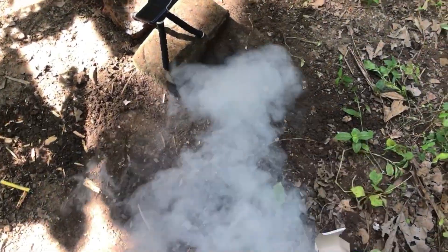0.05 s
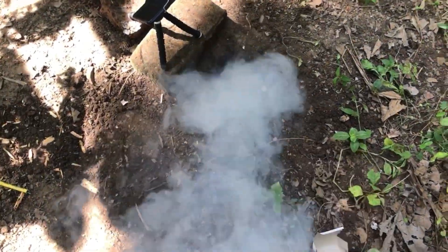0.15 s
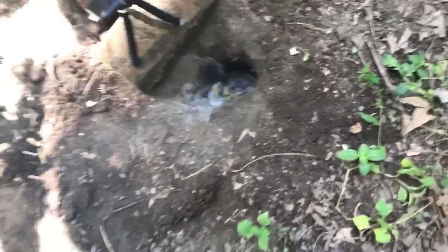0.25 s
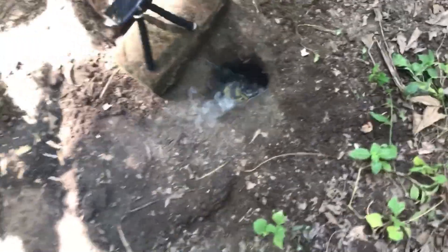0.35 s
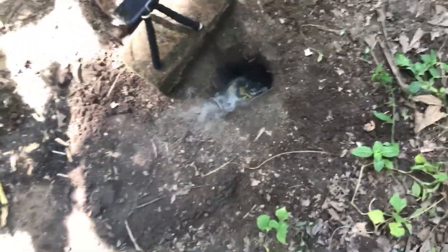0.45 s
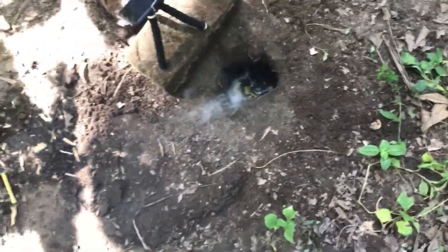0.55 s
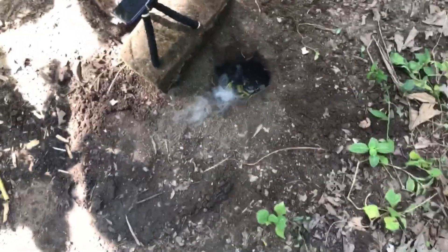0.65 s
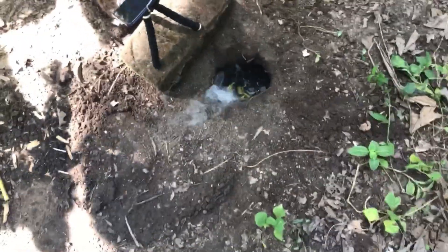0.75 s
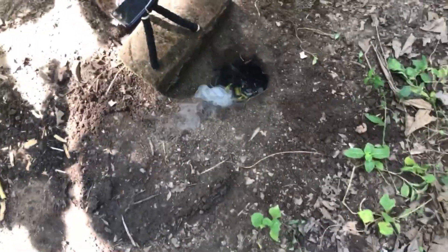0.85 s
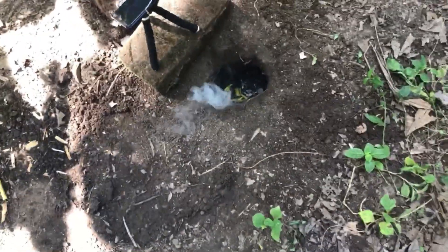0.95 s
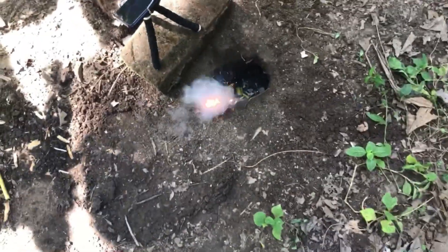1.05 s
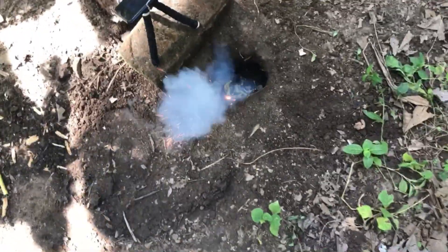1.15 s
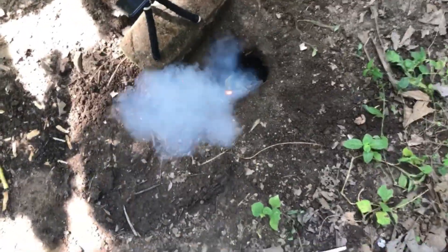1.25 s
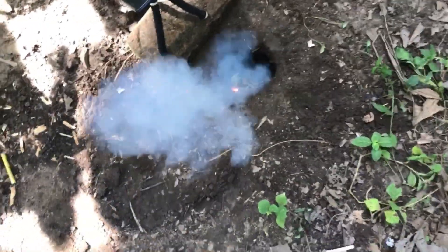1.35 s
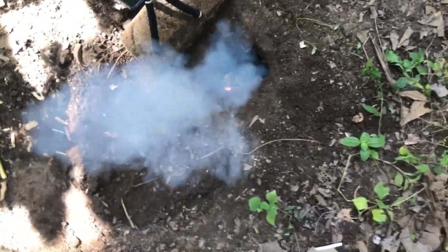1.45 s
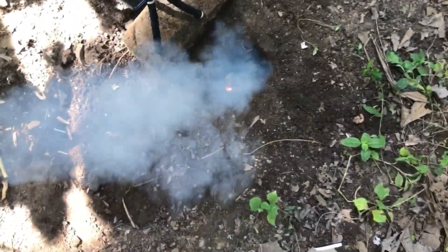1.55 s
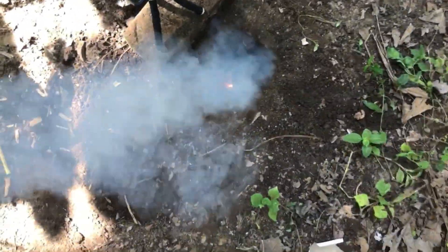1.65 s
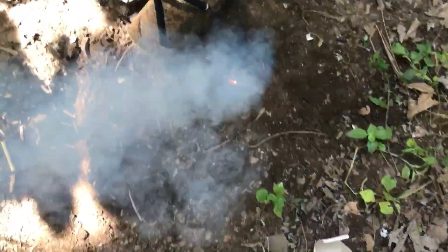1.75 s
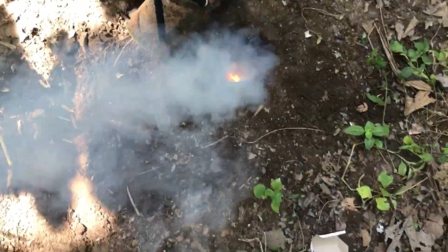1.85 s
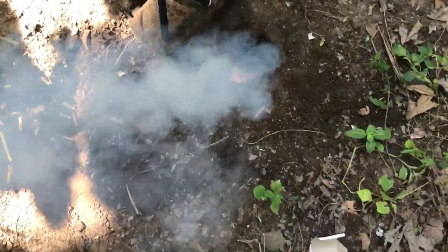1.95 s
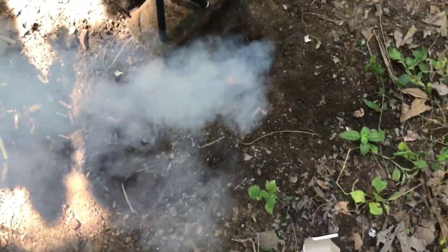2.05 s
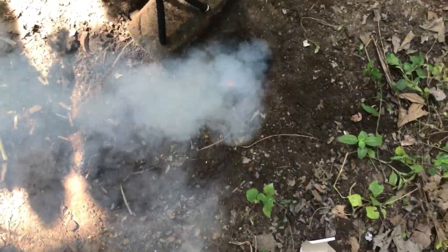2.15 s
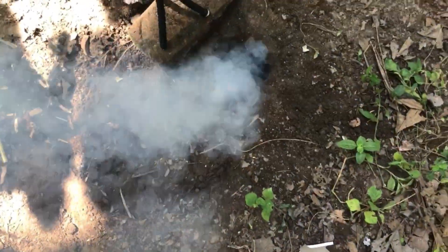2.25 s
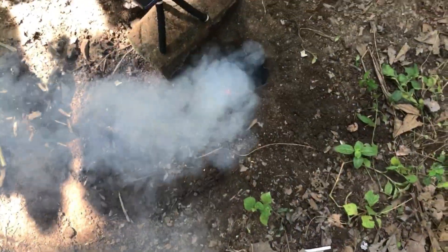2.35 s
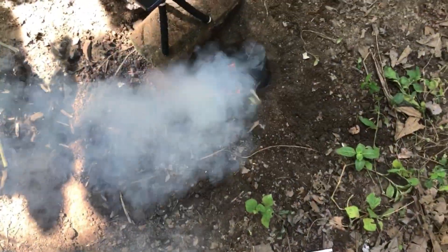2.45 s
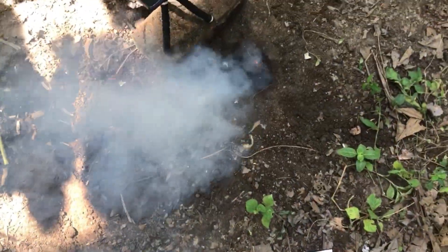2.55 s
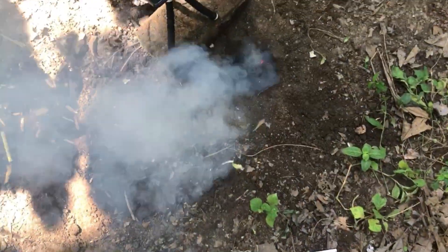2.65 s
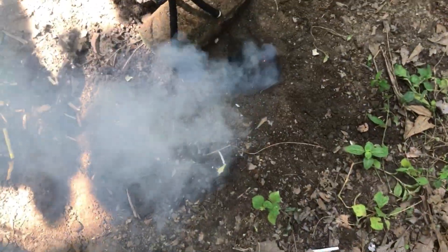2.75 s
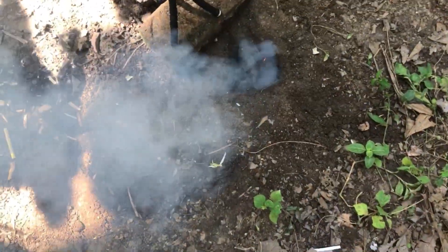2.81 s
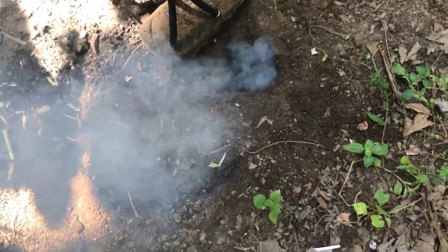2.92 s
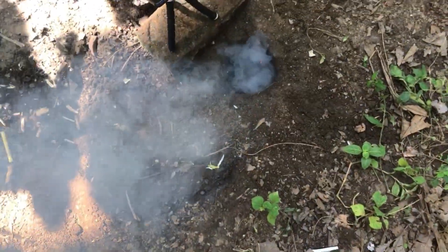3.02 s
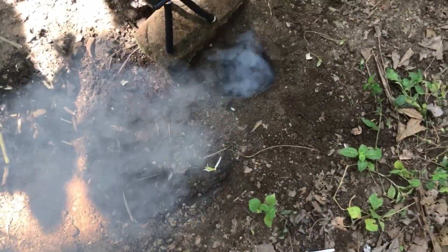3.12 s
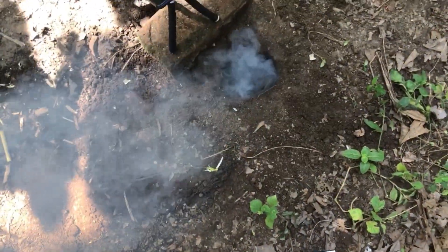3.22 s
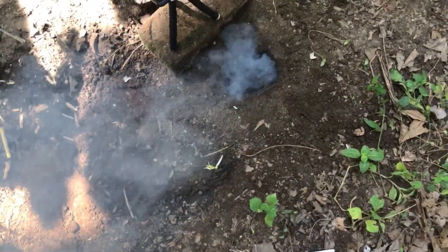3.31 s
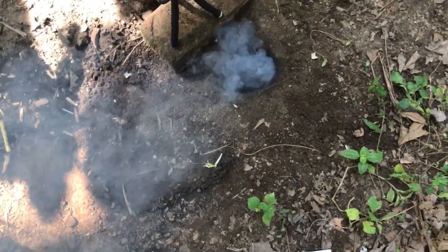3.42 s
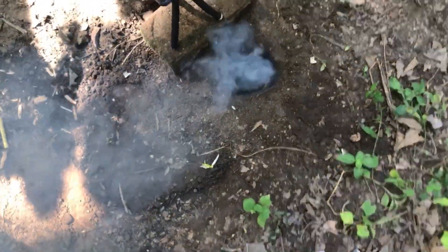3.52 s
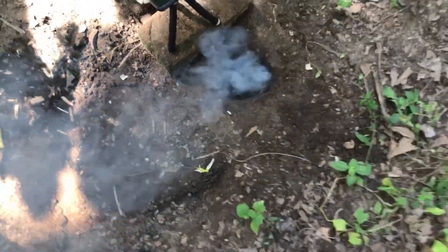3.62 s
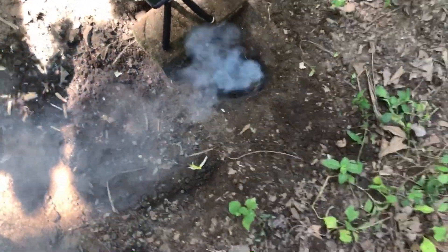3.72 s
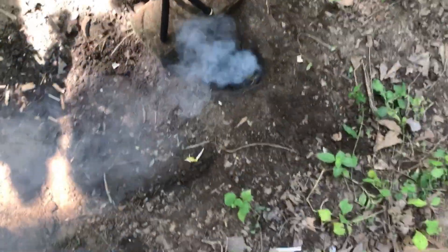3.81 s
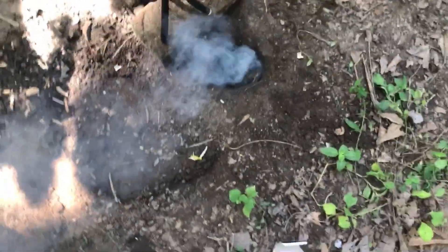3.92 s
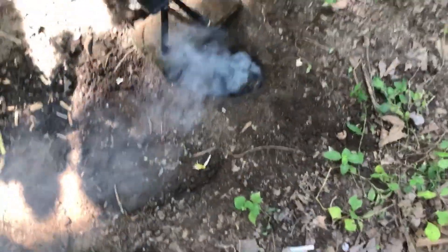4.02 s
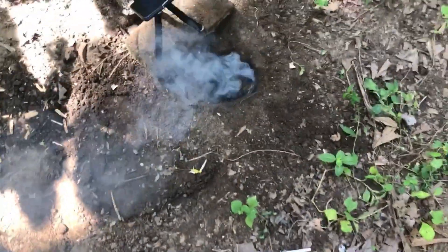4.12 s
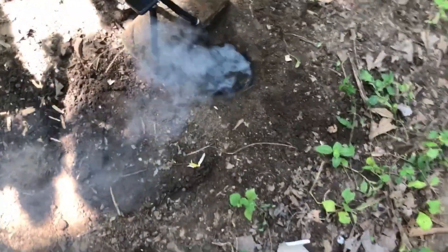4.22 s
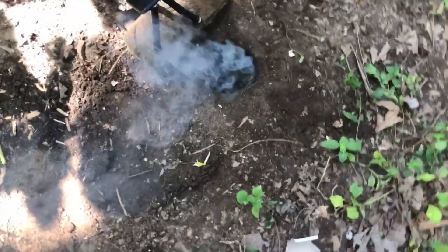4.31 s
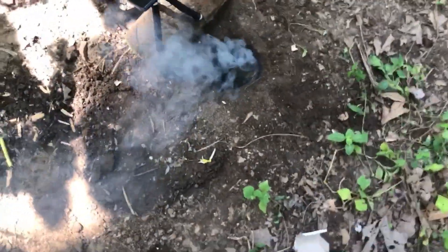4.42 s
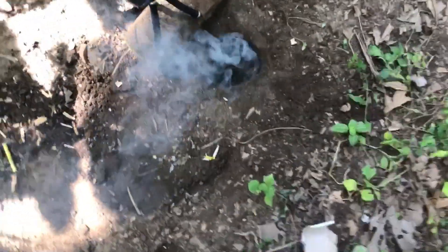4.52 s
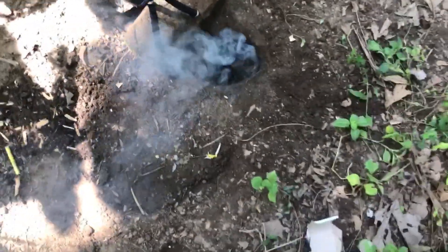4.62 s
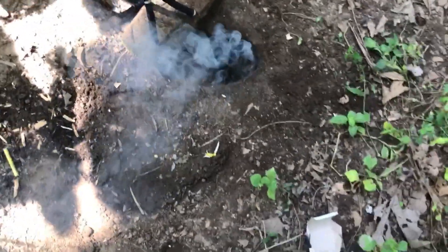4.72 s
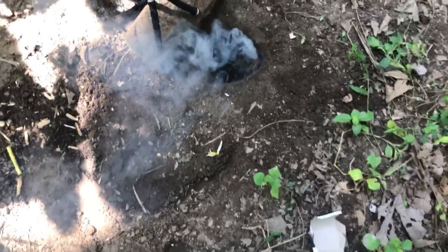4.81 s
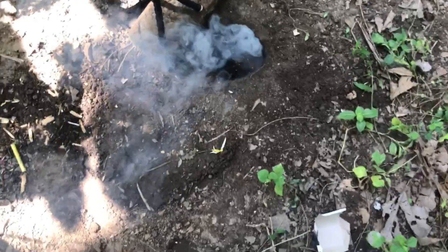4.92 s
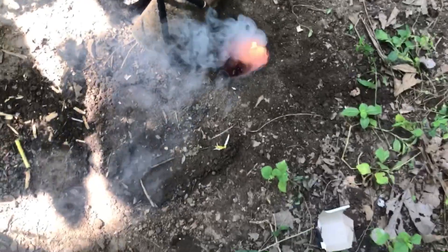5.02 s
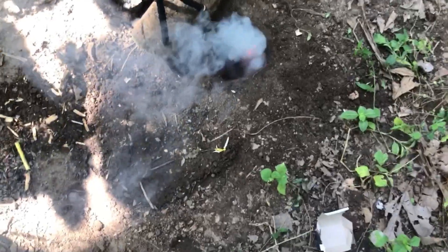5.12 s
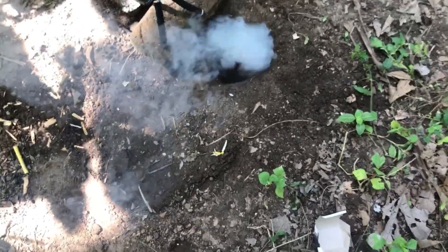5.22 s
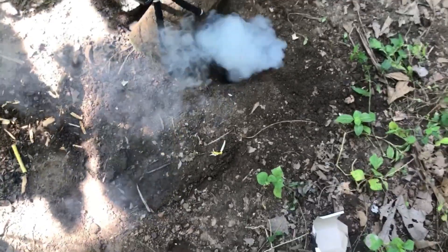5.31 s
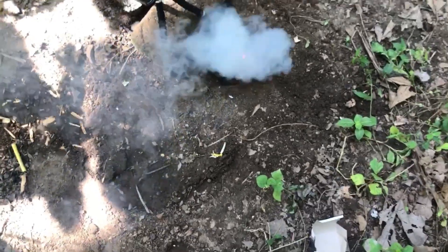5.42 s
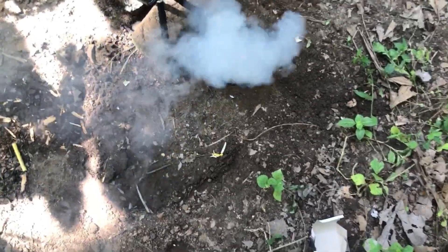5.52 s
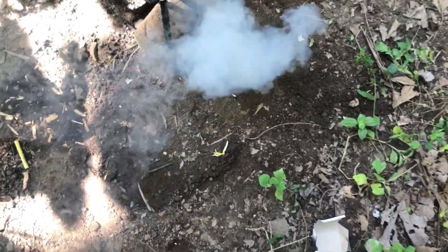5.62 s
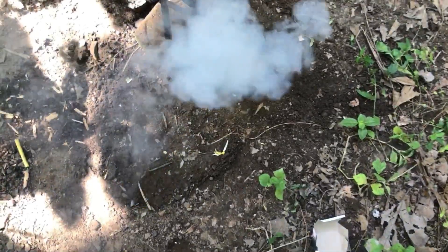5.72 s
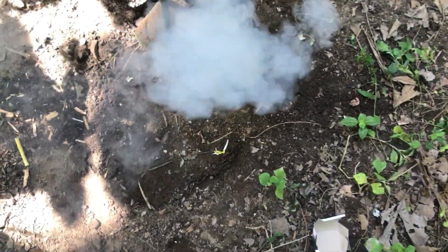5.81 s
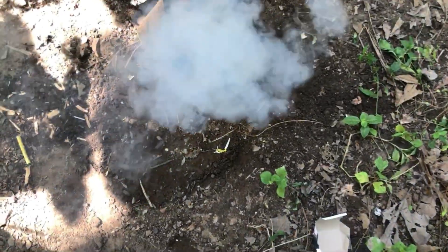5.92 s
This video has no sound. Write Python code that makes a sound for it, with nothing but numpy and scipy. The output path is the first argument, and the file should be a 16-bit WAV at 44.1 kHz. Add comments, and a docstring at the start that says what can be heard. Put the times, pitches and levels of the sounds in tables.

```python
"""Whistling firecrackers in a hole

Small firecrackers go off in a hole in the ground, among trees, while air rumbles at the microphone. Fuses hiss
and spit: these are coloured noise, short bursts and random pops. Each tube shrieks as a stack of locked tones
over a noisy gas jet; its pitch sinks as the fuel burns down and the air column grows. The first tube whistles
alone; then another fuse burns down into a bang of decaying noise that the ground and trees answer. Two more
then whistle together and beat against each other."""
import sys
import numpy as np
from scipy import signal
from scipy.fft import rfft, irfft, next_fast_len
from scipy.io import wavfile
from scipy.ndimage import uniform_filter1d, minimum_filter1d, map_coordinates

SR = 44100
rng = np.random.default_rng(int(sys.argv[2]) if len(sys.argv) > 2 else 0)


def unload_wav(signal):
    """Save mono or channel-first audio to the path in sys.argv[1] as 16-bit WAV at rate SR, clipped to [-1, 1]."""
    wavfile.write(
        sys.argv[1],
        SR,
        np.round(np.clip(np.atleast_2d(signal).T, -1, 1) * 32767).astype(np.int16),
    )


N = 262836
TIME = np.arange(N) / SR  # seconds


def amp(db):
    """Turn decibels into gain."""
    return 10 ** (np.asarray(db) / 20)


def unit(x):
    """Scale a sound to an rms of 1."""
    return x / np.sqrt(np.mean(x ** 2) + 1e-20)


def along(points, hz):
    """Read a value at hz from (Hz, value) points, on a logarithmic frequency axis."""
    point_hz, value = np.transpose(points)
    return np.interp(np.log(hz + 1), np.log(point_hz + 1), value)


def curves(rows):
    """Turn each column after the time into one value per sample."""
    seconds, *columns = np.transpose(rows)
    return [np.interp(TIME, seconds, column) for column in columns]


def wobble(rate):
    """Make a smooth random curve with rate knots a second."""
    knots = rng.standard_normal(int(N * rate / SR) + 4)
    return map_coordinates(knots, [TIME * rate])


def gate(start, end, attack, release):
    """Rise softly from start, hold, and die away exponentially after end."""
    rise = 1 - np.exp(-(np.maximum(TIME - start, 0) / attack) ** 2)
    return rise * np.exp(-np.maximum(TIME - end, 0) / release)


def bump(s, half):
    """Make a bell-shaped swell of height 1 around s."""
    return np.exp(-((TIME - s) / half) ** 2)


def filtered(x, response):
    """Multiply the spectrum of x by a response that depends on frequency."""
    size = next_fast_len(N + SR // 2)
    spectrum = rfft(x, size) * response(np.fft.rfftfreq(size, 1 / SR))
    return irfft(spectrum, size)[:N]


def coloured(x, spectrum):
    """Colour a sound with a table of Hz and dB."""
    return filtered(x, lambda hz: amp(along(spectrum, hz)))


def noise(spectrum):
    """Make noise of rms 1 with the given colour."""
    return unit(coloured(rng.standard_normal(N), spectrum))


def moving_band(hz, width_hz):
    """Make narrow noise with a moving centre and width."""
    phase = 2 * np.pi * np.cumsum(hz) / SR
    clock = np.cumsum(np.abs(width_hz)) / SR  # a wider band drifts faster

    def drift():
        return map_coordinates(rng.standard_normal(N // 10), [clock], mode="wrap")

    return drift() * np.sin(phase) + drift() * np.cos(phase)


def burst(s, hz, width, t60):
    """Pass a short puff of noise through one resonance."""
    def resonance(f):
        return 1j * f * width / (hz * hz - f * f + 1j * f * width)

    ringing = unit(filtered(rng.standard_normal(N), resonance))
    age = TIME - s
    return ringing * (age > 0) * amp(-60 * np.abs(age) / t60)


# Air moving at the microphone. Each row: time in seconds, rumble level in dB.
AIR_LEVELS = [(0, -45), (0.2, -37.5), (0.95, -37.5), (1.2, -58.5), (1.6, -69), (1.85, -64.5), (2.3, -49),
              (3.0, -55), (3.4, -45), (4.7, -43), (5.1, -57), (5.96, -64.5)]
# Colour of the rumble. Each row: frequency in Hz, level in dB.
RUMBLE_COLOUR = [(12, -43), (20, -17), (40, -5.5), (64, 1), (108, -11), (163, -20.5), (242, -23.5),
                 (300, -40), (390, -55.5), (660, -120)]
# Colour of the outdoor hush. Each row: frequency in Hz, level in dB.
HUSH_COLOUR = [(60, -25), (130, -12.5), (350, -2.5), (700, -10), (1300, -11), (3000, -10), (6000, -20.5),
               (14000, -36.5)]
# Low hum and faint far tone. Each row: start in seconds, start of the fade in seconds, pitch in Hz,
# level in dB, attack in seconds, time to fade by 60 dB in seconds.
STEADY_TONES = [(3.94, 4.86, 60.6, -31, 0.022, 0.3), (4.7, 4.9, 60.6, -44.5, .1, 2.6),
                (4.2, 4.17, 640, -51, 0.024, 0.45)]
HUSH_DB, HUSH_FOLLOWS = -37, 0.45  # hush level before it follows the rumble, and share of the rumble dB added


def outdoors():
    """Air rumbles at the microphone over a hush; a low hum and a faint far tone come and go."""
    rumble_db, = curves(AIR_LEVELS)
    rumble = amp(rumble_db + 1.7 * wobble(3.3)) * noise(RUMBLE_COLOUR)
    hush = amp(HUSH_DB + HUSH_FOLLOWS * rumble_db) * noise(HUSH_COLOUR)
    tones = np.zeros(N)
    for start, end, hz, db, attack, t60 in STEADY_TONES:
        swell = gate(start, end, attack, t60 / np.log(1000))
        tones += amp(db) * swell * np.sin(2 * np.pi * hz * TIME)
    return rumble + hush + np.sqrt(2) * tones


# How long the trees ring. Each row: frequency in Hz, time to fade by 60 dB in seconds.
TREE_FADES = [(200, 0.42), (2000, 0.63), (3800, 0.87), (8000, 0.34), (14000, 0.83)]


def trees(x):
    """Trunks and leaves scatter the sound into a tail that fades at its own pace at each frequency."""
    hz, t, cells = signal.stft(rng.standard_normal(SR), SR, nperseg=256)
    fade = amp(-60 * t / along(TREE_FADES, hz)[:, None])
    tail = signal.istft(cells * fade, SR, nperseg=256)[1]
    return signal.fftconvolve(x, tail / np.linalg.norm(tail))[:N]


def hollow(x, t60):
    """The hole and the ground around it send back quick reflections."""
    t = TIME[:SR // 5]
    tail = rng.standard_normal(len(t)) * amp(-60 * t / t60)
    return signal.fftconvolve(x, tail / np.linalg.norm(tail))[:N]


# Snapping sparks. Each row: time in seconds, level in dB, resonance in Hz.
SPARK_SNAPS = [(1.3375, -19, 4200), (2.3965, -29, 2800), (3.312, -50, 6500), (3.359, -42, 3194),
               (3.578, -41, 5000), (3.685, -46.5, 6180), (3.77, -50, 3000), (3.938, -42, 3500)]
# Gas puffs in the hole. Each row: time in seconds, level in dB, time to fade by 60 dB in seconds.
GAS_PUFFS = [(5.014, -36.5, 0.27), (5.052, -24.5, .09), (5.444, -37.5, 0.18)]


def sparks():
    """Sparks snap; puffs of gas sound the hollow of the hole."""
    snaps = sum(amp(db) * burst(s, hz, width=4500, t60=.02) for s, db, hz in SPARK_SNAPS)
    puffs = sum(amp(db) * burst(s, hz=365, width=150, t60=t60) for s, db, t60 in GAS_PUFFS)
    soft_snaps = filtered(snaps, lambda hz: 1 / (1 + (hz / 8000) ** 4))
    soft_puffs = filtered(puffs, lambda hz: 1 / (1 + (hz / 750) ** 4))
    return soft_snaps + soft_puffs


# Colour of popping powder grains. Each row: frequency in Hz, level in dB.
CRACKLE_COLOUR = [(500, -24), (2500, -7), (6500, -2), (10000, 1), (15000, -26.5)]


def crackle(burn, count=40):
    """Grains of powder pop at random, each as loud as the burning at that moment allows."""
    when, weakness = rng.random((count, 2)).T
    pops = np.zeros(N)
    pops[(when * (N - 1)).astype(int)] = amp(33.5 - 13 * weakness)
    return coloured(hollow(pops * burn, t60=.015), CRACKLE_COLOUR)


# Burning fuses, with end levels before the last flare. Each row: start in seconds, end in seconds,
# fade-in in seconds, hiss level at the end in dB, its swell in dB per second, sizzle level at the end in dB,
# its swell in dB per second (negative sinks), mouth resonance at the end in Hz.
FUSE_BURNS = [(0.204, 1.005, 0.007, -41, 14, -51, 8.5, 4490), (1.85, 2.454, .1, -51, 52, -51, 44, 4400),
              (2.65, 4.83, .8, -39.5, 12, -51.5, -1.5, 4155)]
CATCH_DB, CATCH_S, FUSE_OUT_S = 12.5, 0.038, .012  # a fuse flares as it reaches the charge, then goes out
MOUTH_RISE_HZ_PER_S = 320
EDGE_DB = -14  # shrill edge relative to the sizzle, outside the spurt
SPURT_S, SPURT_HALF_S, SPURT_DB = 3.72, 0.6, 18.5  # the last fuse blows a narrow jet for a while


def fuse_controls():
    """Hiss, sizzle, edge and mouth resonance change as a fuse burns into its tube and flares at the charge."""
    hiss, sizzle, mouth_hz = np.zeros((3, N))
    for start, end, fade_in, hiss_db, hiss_swell, sizzle_db, sizzle_swell, hz in FUSE_BURNS:
        left = np.clip(end - TIME, 0, end - start)  # seconds left to burn
        flare = amp(CATCH_DB * np.exp(-left / CATCH_S))
        alight = gate(start, end, fade_in, FUSE_OUT_S) * flare
        hiss += alight * amp(hiss_db - hiss_swell * left)
        sizzle += alight * amp(sizzle_db - sizzle_swell * left)
        mouth_hz = np.where(TIME > start, hz - MOUTH_RISE_HZ_PER_S * left, mouth_hz)
    edge = sizzle * amp(EDGE_DB + SPURT_DB * bump(SPURT_S, SPURT_HALF_S))
    return hiss, sizzle, edge, mouth_hz


# Colour of the breath across the tube mouth. Each row: frequency in Hz, level in dB.
MOUTH_COLOUR = [(400, -8), (1200, -20), (2500, -3.5), (3500, 0.5), (4700, 1), (5400, -7.5), (7500, -18.5),
                (10000, -37.5)]
# Colour of the sizzling powder. Each row: frequency in Hz, level in dB.
SIZZLE_COLOUR = [(4000, -28.5), (6500, -21.5), (7500, -17), (9500, -4), (10700, -5), (12300, -1),
                 (13300, -10.5), (15500, -25.5)]
# Colour of a fuse's narrow jet. Each row: frequency in Hz, level in dB.
EDGE_COLOUR = [(7500, -30.5), (8700, -13), (9650, 1.5), (10500, -13.5), (11500, -29)]


def fuses():
    """Burning powder sizzles, pops and blows across the tube mouth."""
    hiss, sizzle, edge, mouth_hz = fuse_controls()
    ring = amp(-1.5) * moving_band(mouth_hz, np.full(N, 750))  # 750 Hz wide
    breath = amp(-4.5) * noise(MOUTH_COLOUR)
    mouth = hiss * amp(1.1 * wobble(120)) * (ring + breath)
    powder = sizzle * noise(SIZZLE_COLOUR) + edge * noise(EDGE_COLOUR)
    return mouth + amp(1.2 * wobble(210)) * powder + crackle(edge)


ATTACK_S, RELEASE_S = .008, 0.0055  # moans and notes start and stop quickly
# Modes of the moaning tube. Each row: multiple of the moan's pitch, level in dB relative to the moan.
MOAN_MULTIPLES = [(1, -4), (1.5, -15.5), (2, 2.5), (4, -9)]
MOAN_START_S, MOAN_END_S, MOAN_DB = .205, 1.005, -49.5
MOAN_HZ, MOAN_SAG_HZ_PER_S = 820, 148  # starting pitch and how fast it sinks
MOAN_WIDTH_HZ, MOAN_NARROWS_S = 260, 0.46  # starting width and time constant of its narrowing


def moan():
    """Before the tube locks into its note, turbulence sounds its modes as noise bands that sink and narrow."""
    age = np.clip(TIME - MOAN_START_S, 0, MOAN_END_S - MOAN_START_S)
    hz = (MOAN_HZ - MOAN_SAG_HZ_PER_S * age) * (1 + 0.012 * wobble(30))
    width_hz = MOAN_WIDTH_HZ * np.exp(-age / MOAN_NARROWS_S)
    modes = sum(amp(db + 1.4 * wobble(14)) * moving_band(k * hz, width_hz) for k, db in MOAN_MULTIPLES)
    return gate(MOAN_START_S, MOAN_END_S, ATTACK_S, RELEASE_S) * amp(MOAN_DB) * modes


# Colour of the returning bang. Each row: frequency in Hz, level in dB.
ECHO_COLOUR = [(50, -16.5), (130, -9), (380, -1), (620, -10), (1000, -2), (2500, 0.5), (3800, -2.5),
               (6000, -12), (12000, -21), (14500, -33)]
# Colour of the air in the hole and the ground. Each row: frequency in Hz, level in dB.
BOOM_COLOUR = [(30, -8), (70, -2.5), (140, 0.5), (250, -7.5), (400, -4.5), (700, -36)]
NEAR_DB, NEAR_T60_S = -16, .33  # from the ground nearby
FAR_DB, FAR_RISE_S, FAR_HOLD_S, FAR_T60_S = -34, .11, 0.27, .85  # from the trees
THUD_DB, THUD_LUMPS_DB = -17, 3  # the bass returns in lumps: its level and unevenness


def echo(age):
    """The ground answers the bang at once; the trees hold it for a moment and let it die."""
    near = amp(NEAR_DB - 60 * age / NEAR_T60_S)
    far_fade = amp(FAR_DB - 60 * np.maximum(age - FAR_HOLD_S, 0) / FAR_T60_S)
    far = far_fade * (1 - np.exp(-age / FAR_RISE_S))
    thuds = amp(THUD_DB + THUD_LUMPS_DB * wobble(30)) * noise(BOOM_COLOUR)
    return np.hypot(near, far) * (amp(0.82 * wobble(70)) * noise(ECHO_COLOUR) + thuds)


# Colour of the blast. Each row: frequency in Hz, level in dB.
BLAST_COLOUR = [(59, -35), (100, -1.5), (184, -5), (614, -6.5), (712, -9.5), (843, -1), (1110, -7),
                (1460, -4.5), (2420, -2), (6390, -14), (11800, -17.5), (15500, -32.5)]
BANG_S = 2.4632


def bang():
    """The shock rattles and booms in the hole, a pressure wave swings the microphone, and the trees answer."""
    age = np.maximum(TIME - BANG_S, 0)
    lit = TIME > BANG_S
    # each part loses 60 dB in the time that divides its age
    shock = noise(BLAST_COLOUR) * amp(-5 - 60 * age / .014)
    rattle = noise(BLAST_COLOUR) * amp(-5.5 - 60 * age / 0.26 + 2.3 * wobble(260))
    boom = noise(BOOM_COLOUR) * amp(-12 - 60 * age / 0.16)
    # the swing follows 8 ms later, starting at 45 Hz and slowing down
    swing_age = np.maximum(age - .008, 0)
    swell = (1 - np.exp(-swing_age / 0.0048)) * amp(3.0 - 60 * swing_age / .11)
    swing = -swell * np.cos(2 * np.pi * 45 * swing_age / (1 + swing_age / 0.44))
    # so strong a blast drives the diaphragm to the end of its travel
    blast = np.tanh(shock + rattle + boom + swing)
    return lit * (blast + echo(age))


# Colour of the jet's roar. Each row: frequency in Hz, level in dB.
ROAR_COLOUR = [(100, -5.5), (250, -1), (420, 10.5), (620, -4), (900, 1.5), (1300, -7.5), (2000, 0.5),
               (3000, -23), (6000, -47)]
# Colour of the jet's rush. Each row: frequency in Hz, level in dB.
RUSH_COLOUR = [(1200, -29), (2200, -7), (3200, -2), (3900, 7), (4600, 2), (5200, -13.5), (5700, -21),
               (7300, -14.5), (9200, -8), (10300, -9), (12300, 4), (13300, -15), (15000, -33)]
ROAR_GROWS, RUSH_DB = 1.2, -7  # roar and rasp swell 1.2 times as many dB as the rush; rush relative to thrust
RASP_HZ, RASP_WIDTH_HZ = 1045, 800  # the middle register of a gas jet


def exhaust(thrust_db, swell_db, roar_db, rasp_db):
    """The gas jet of a whistling tube sputters under its note; its roar and rasp grow fastest in a flare."""
    sputter = amp(thrust_db + 2.5 * wobble(220) + 0.9 * wobble(35))
    roar = amp(roar_db) * noise(ROAR_COLOUR)
    rasp = amp(rasp_db) * moving_band(np.full(N, RASP_HZ), np.full(N, RASP_WIDTH_HZ))
    rush = amp(RUSH_DB + swell_db) * noise(RUSH_COLOUR)
    return sputter * (amp(ROAR_GROWS * swell_db) * (roar + rasp) + rush)


# Uneven burning makes a tube choke, splutter or jump in pitch. Each row: time in seconds,
# half length in seconds, pitch jump in Hz, change of the note in dB, change of the gas noise in dB.
BURN_SURGES = [(1.006, .003, -80, -16, 6), (1.066, .006, 150, -5, 1), (1.105, .04, 0, 0, 3),
               (1.832, .013, 260, -3, 5), (4.827, .006, 150, 0, 3), (4.877, .014, 130, -4, 6),
               (5.36, .05, 0, 0, 2), (5.458, .022, 70, 2, 4), (5.79, .008, -30, -2, 6),
               (5.804, .007, 280, 0, 2)]


def surges():
    """Uneven burning adds up to a pitch jump (Hz), a note change (dB) and a gas noise change (dB)."""
    return sum(np.outer(change, bump(s, half)) for s, half, *change in BURN_SURGES)


# Upper partials of a whistle. Each row: multiple of the fundamental, level in dB relative to the thrust and flare.
UPPER_PARTIALS = [(3, -8.5), (4, -5), (5, -7.5), (6, -3.5), (7, -7), (8, -16.5)]
SLIP = .5  # phase slip of the upper partials against the shrill one, radians


def whistle(hz, shrill_db, base_db, upper_db, build, jitter):
    """Fuel burns in pulses locked to the tube's air column; uneven burning shakes pitch and level."""
    shake = jitter * wobble(600) + .002 * wobble(110)
    # hz is the shrill second partial, so the fundamental turns at half its speed
    phase = np.pi * np.cumsum(hz * (1 + shake)) / SR
    shrill = amp(shrill_db + 0.61 * wobble(110)) * np.sin(2 * phase)
    # the weaker partials drift in strength and slip against the shrill one
    base = build ** 2 * amp(base_db + 0.75 * wobble(90)) * np.sin(phase + 0.18 * wobble(200))
    upper = np.zeros(N)
    for k, db in UPPER_PARTIALS:
        joining = build if round(k) % 2 else 1  # odd partials join once the pulses alternate
        level = amp(upper_db + db + 2.4 * wobble(140) + 2.6 * wobble(12))
        upper += joining * level * np.sin(k * phase + SLIP * wobble(300))
    return np.sqrt(2) * (shrill + base + upper)


# Notes of the three tubes, before the treble colouring and surges. Each row: time in seconds,
# pitch of the shrill second partial in Hz, its level in dB.
FIRST_NOTE = [(1.001, 4222, -7), (1.05, 4365, -1), (1.083, 4276, -5), (1.178, 4223, -8.5),
              (1.311, 4069, -14), (1.411, 3861, -20.5), (1.48, 3786, -17), (1.59, 3660, -20),
              (1.615, 3636, -13), (1.691, 3624, -13), (1.79, 3495, -18.5)]
SECOND_NOTE = [(4.84, 4602, -6.5), (4.921, 4624, -3), (4.99, 4457, -6), (5.03, 4426, -17),
               (5.08, 4550, -14.5), (5.17, 4269, -15.5), (5.24, 4157, -13.5), (5.3, 3950, -14),
               (5.353, 3840, -14), (5.375, 3881, -24.5), (5.469, 4057, -23.5)]
THIRD_NOTE = [(5.09, 4612, -21.5), (5.2, 4337, -33), (5.335, 4085, -18), (5.38, 3890, -19),
              (5.5, 3993, -19.5), (5.562, 3882, -23.5), (5.64, 3835, -32), (5.759, 3780, -24),
              (5.792, 3603, -22)]
# How air and microphone colour the shriek. Each row: frequency in Hz, level in dB.
TREBLE_COLOUR = [(4900, 1), (5500, 1), (6900, -1), (8600, -3.5), (9400, 1), (10500, -3), (12600, -1),
                 (13800, -8.5), (15500, -17.5)]
# How each tube burns. Each row: start in seconds, end in seconds, starting thrust in dB, flare at ignition in dB,
# fundamental over thrust and flare in dB, its loss by the end in dB (negative gains),
# roar over thrust in dB, rasp over thrust in dB, pitch jitter as a share before spluttering.
TUBE_BURNS = [(0.989, 1.835, -24, 8.5, -6.5, 17, -27, -28.5, 0.0057),
              (4.821, 5.536, -28.5, 13, -10, 22, -27.5, -46.5, .008),
              (5.066, 5.805, -29, -2, -14.5, -4.5, -21, -34, .009)]
BUILD_S = 0.026  # the jet and the odd partials build up later than the note
FLARE_AT_S, FLARE_S = .095, 0.097  # the fuel flares soon after ignition: delay and half length
THRUST_FADE_DB_PER_S, BURNOUT_DB = 5, 2  # steady loss of thrust, and extra loss as the fuel runs out
SPLUTTER = .8  # share of the gas noise change (dB) that roughens the pitch


def whistles():
    """Three tubes shriek over gas jets; one thrust drives each tube's overtones and jet."""
    jump_hz, choke_db, gas_db = surges()
    notes, jets = np.zeros((2, N))
    for note, tube in zip((FIRST_NOTE, SECOND_NOTE, THIRD_NOTE), TUBE_BURNS):
        start, end, db, flare, base_db, base_loss_db, roar_db, rasp_db, jitter = tube
        hz, shrill_db = curves(note)
        age = np.clip(TIME - start, 0, end - start)
        spent = (age / (end - start)) ** 3  # stays small until late in the burn
        thrust_db = db - THRUST_FADE_DB_PER_S * age - BURNOUT_DB * spent
        flare_db = flare * bump(start + FLARE_AT_S, FLARE_S)
        upper_db = thrust_db + flare_db
        fundamental_db = upper_db + base_db - base_loss_db * spent
        burning = gate(start, end, ATTACK_S, RELEASE_S)
        build = 1 - np.exp(-(age / BUILD_S) ** 2)
        rough = jitter * amp(SPLUTTER * gas_db)
        tone = whistle(hz + jump_hz, shrill_db + choke_db, fundamental_db, upper_db, build, rough)
        notes += burning * tone
        jets += burning * build * exhaust(thrust_db, flare_db + gas_db, roar_db, rasp_db)
    return coloured(notes, TREBLE_COLOUR), jets


def scene():
    """Mix everything as heard from just above the hole."""
    shriek, jet = whistles()
    space = amp(-12.5) * hollow(shriek, t60=0.3) + amp(-14.5) * trees(shriek + jet)
    mix = outdoors() + sparks() + fuses() + moan() + bang() + space + jet + shriek
    return mix[None]


TOP_HZ = 15750  # band limit


def record(dry):
    """A fast limiter turns down the loudest moments; nothing passes above the band limit."""
    needed = np.minimum(1, .95 / (np.abs(dry[0]) + 1e-9))
    hold = minimum_filter1d(needed, size=89)  # 89 samples, about 2 ms
    gain = uniform_filter1d(hold, size=89)
    return filtered(dry[0] * gain, lambda hz: hz < TOP_HZ)[None]


dry = scene()
out = record(dry)
unload_wav(out)
```